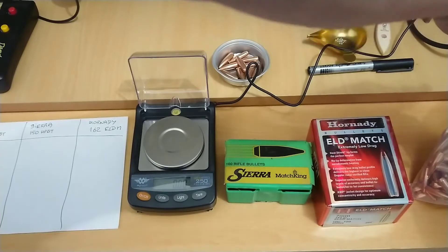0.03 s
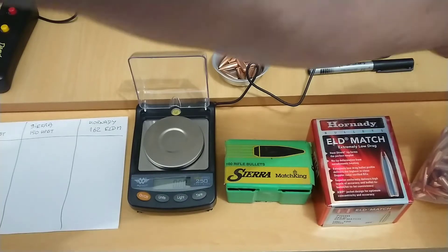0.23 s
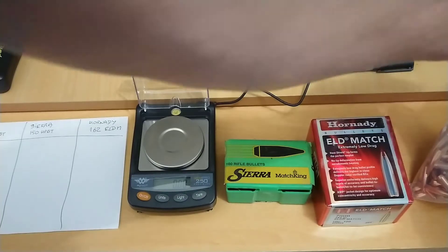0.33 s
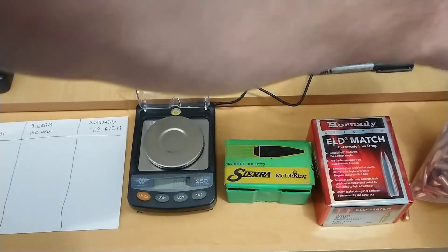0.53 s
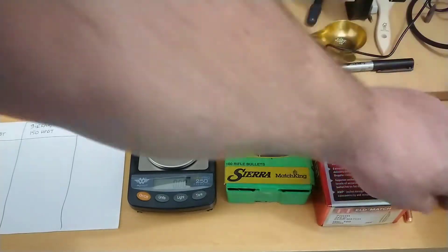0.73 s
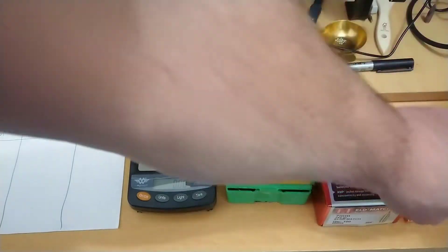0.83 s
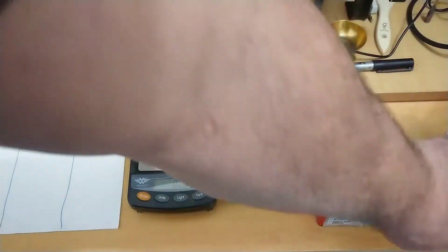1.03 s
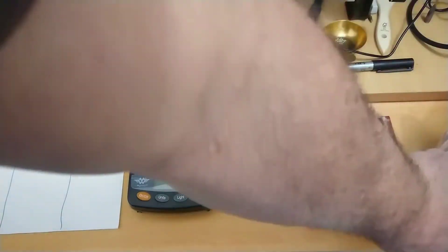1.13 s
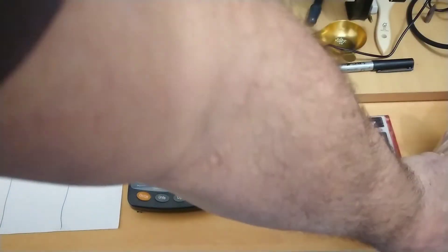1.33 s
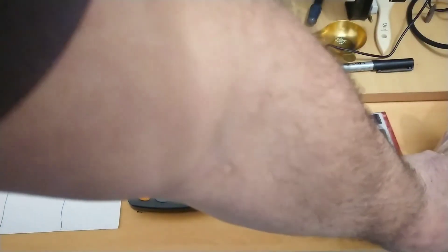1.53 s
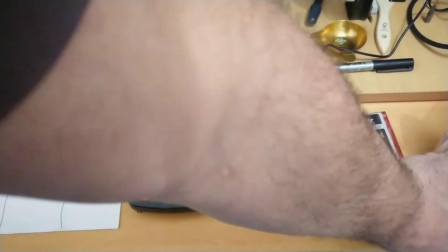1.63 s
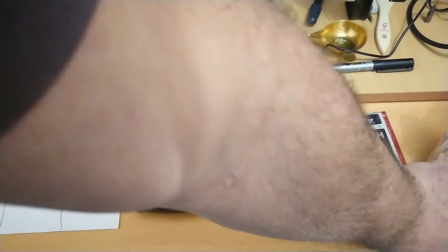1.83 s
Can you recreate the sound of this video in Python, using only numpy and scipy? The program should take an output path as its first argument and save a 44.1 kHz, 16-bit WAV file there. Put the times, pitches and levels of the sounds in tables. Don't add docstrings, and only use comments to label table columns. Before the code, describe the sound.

A bag of loose metal bullets drops on a desk, clattering, bouncing and settling, then faint rustling

```python
import sys
import numpy as np
from scipy import signal
from scipy.fft import rfft, irfft
from scipy.io import wavfile
from scipy.ndimage import uniform_filter1d

SR = 44100
rng = np.random.default_rng(int(sys.argv[2]) if len(sys.argv) > 2 else 0)


def pcm_store(signal):
    levels = np.round(np.clip(np.atleast_2d(signal), -1, 1) * 32767)
    wavfile.write(sys.argv[1], SR, levels.astype(np.int16).T)


def convert_level_to_amplitude(level_db):
    exponent = np.asarray(level_db, float) / 20
    return 10 ** exponent


N = 83790
RISE_S = .0006

# t/s, clatter/dB, desk thud re clatter/dB, bright tick re clatter/dB, hardness/dB
BOUNCES = [(0.19, -47, -8, -3, -2.5), (0.228, -30.5, -9, -7.5, -4.5), (0.2386, -33, 12, -12, -11),
           (0.2459, -25, -15.5, -6.5, 0), (0.249, -20, -17, -15, 1), (.2535, -23.5, -19.5, -8, -8),
           (.260, -19.5, -14, -30, -1.5), (0.268, -30, -18, -19.5, 2.5), (0.278, -26, -15, -14.5, 9.5),
           (0.3721, -26.5, -7.5, -13, -26), (0.391, -28.5, -2.5, -19.5, -28), (0.401, -34.5, -1, -15, -29),
           (0.4279, -38, -11, -24, -29.5), (0.4514, -38.5, -19.5, -29, -10), (0.474, -31, -13.5, -26, 3.5),
           (0.4771, -27.5, -35, -8.5, 1.5), (0.509, -41.5, -8.5, -35, 11.5), (0.543, -24, -8.5, -12, -30),
           (.6084, -26.5, -10, -17.5, -20), (.641, -37, -33, -14, 0), (0.656, -31.5, -13, -18.5, -3),
           (0.681, -31, -9, -18.5, -30), (0.708, -38, -0.5, -30, -27), (0.746, -40, -6, -49, -36)]
# t/s, level/dB, hardness/dB
STRIKES = [(.2458, 1, -6), (.2501, 12, -7), (.2535, 0, -5), (.3729, 3, -18), (.4011, -3.5, -18),
           (.4267, -6, -18), (.4741, -6.5, -3), (.4765, -5, -6), (.4777, 7.5, -4), (.5429, 7, -14),
           (.6086, 2.5, -15), (.6551, -5, -7), (.6811, -1.5, -18), (.7069, -7, -18)]
# f/Hz, density/dB
CLATTER = [(290, -41.5), (500, -8.5), (1000, -1.5), (1390, -4.5), (1700, 0), (2200, 3), (3820, -23),
           (5000, -29), (6500, -50.5), (11000, -120)]
# f/Hz, density/dB
HARD = [(3000, -0.5), (3600, 2.8), (5000, -6.5), (6000, -12.5), (7000, -15)]


def bullets():
    # f/Hz, density/dB
    bright = [(5500, -7), (7200, 4), (8500, -2), (11000, -6), (13200, -2), (15000, -5), (15500, -9),
              (16000, -22)]
    # f/Hz, level/dB, T60/s
    desk = [(371.8, 4, 0.044), (438.6, 7, 0.081), (270.7, -5.5, 0.11), (528.5, -5, 0.082)]
    times, clatter, thud, tick, hardness = np.transpose(BOUNCES)
    shake = agitation(clatter, .007, -11, .015, stir_db=7.5)
    hard = agitation(clatter + hardness, .007, -6.5, .01, stir_db=-15.5)
    snap = agitation(clatter + tick, .0014, -17, .014, stir_db=-22)
    push = sum(convert_level_to_amplitude(db + 8.5) * blow(s, .00088) for s, db in zip(times, clatter + thud))

    body = panel() - clink() + firm_strikes(shake)
    body += convert_level_to_amplitude(-6.5) * through(shake * collisions(), colour(sloped(CLATTER)))
    body += convert_level_to_amplitude(-5.5) * through(hard * collisions(), colour(sloped(HARD)))
    crackle = convert_level_to_amplitude(4.5) * through(snap * collisions(), colour(sloped(bright)))
    return without_lows(body + crackle + through(push, ring(desk)))


def firm_strikes(shake):
    # f/Hz, density/dB
    strike = [(290, -35), (480, -16), (660, -19), (920, -6), (1400, -3), (2300, -1), (3100, -1),
              (4200, -11), (5500, -26), (11000, -60)]
    # delay/ms, signed gain/1
    paths = [(.14, -.14), (1.29, .17), (2.24, -.08), (2.59, .36), (2.88, -.09), (3.74, -.08), (3.97, .28),
             (4.6, -.34), (5.76, .18), (6.58, -.14), (7.12, .12), (7.55, .09), (7.85, -.16), (8.21, .14),
             (8.62, -.12), (9.32, .11), (9.68, .15), (11.88, .26), (12.72, .1), (13.27, .14), (13.95, .12),
             (14.31, -.1), (15.46, .22), (16.3, .14), (17.1, -.08), (17.48, -.1), (18.91, -.11),
             (19.52, .16), (21.66, .09), (22.63, -.1), (24.4, .08), (26.6, -.07), (27.3, .07), (29.8, .1),
             (33.6, .09), (34.6, -.07), (38.2, .07), (42, -.05)]
    blows = spikes([(s, convert_level_to_amplitude(db)) for s, db, _ in STRIKES])
    hard_blows = spikes([(s, convert_level_to_amplitude(db + hard_db)) for s, db, hard_db in STRIKES])
    firm = through(blows + convert_level_to_amplitude(-9) * shake * collisions(), colour(sloped(strike)))
    firm += through(hard_blows, colour(sloped(HARD)))
    reflections = spikes([(ms / 1000, gain) for ms, gain in paths])[:SR // 20]
    return through(firm, reflections)


def panel():
    # f/Hz, level/dB, T60/s
    panel_modes = [(928, 0, .05), (1215, -3, .05)]
    blows = spikes([(s + .002, convert_level_to_amplitude(db)) for s, db, _ in STRIKES])
    return convert_level_to_amplitude(-38) * through(blows, ring(panel_modes))


def clink():
    metal = colour(sloped(CLATTER)) + .5 * colour(sloped(HARD))
    return through(spikes([(.2391, convert_level_to_amplitude(-9))]), metal)


def agitation(levels, fast_s, slow_db, slow_s, stir_db):
    # t/s, level/dB
    stir = [(.3, -70), (.36, -63), (.42, -49.5), (.52, -59.5), (.64, -40.5), (.71, -52.5), (.77, -62.5),
            (.84, -62), (.9, -92)]
    bursts = sum(convert_level_to_amplitude(db) * after(row[0], fast_s, slow_db, slow_s) for row, db in zip(BOUNCES, levels))
    started = np.arange(N) > stir[0][0] * SR
    return bursts + convert_level_to_amplitude(stir_db) * convert_level_to_amplitude(curve(stir)) * started


def collisions():
    clicks_per_s, spread_db, first_db = 6000, 2.2, 13
    size = convert_level_to_amplitude(spread_db * np.minimum(rng.exponential(1, N), 4)) * rng.choice([-1., 1.], N)
    train = evened(size * (rng.random(N) < clicks_per_s / SR))
    train[[round((row[0] + 2 * RISE_S) * SR) for row in BOUNCES]] = convert_level_to_amplitude(first_db)
    return train


def without_lows(x):
    return signal.sosfilt(signal.butter(10, 255, "high", fs=SR, output="sos"), x)


def nudges():
    # t/s, level/dB, upper modes re level/dB, contact/s
    soft = [(0.148, -49, -33, 0.0056), (1.153, -57.5, -21.5, 0.0075), (1.173, -52.5, -14, 0.011),
            (1.627, -35.5, -7.5, 0.0054), (1.646, -60.5, 8, 0.007), (1.6862, -38, -4.5, 0.012),
            (1.71, -49.5, -28, 0.0156), (1.804, -67, 1.5, 0.015)]
    # f/Hz, level/dB
    hollow = [(374, 0), (470, -16), (265, -16)]
    # f/Hz, level/dB
    box = [(748, -6), (1091, 0), (1211, -7), (1465, -2), (900, -14)]
    # t/s, level/dB, f/Hz, contact/s
    taps_on_box = [(.775, -58, 740, .012), (.79, -58, 1090, .012), (.8, -59, 900, .01),
                   (.818, -57, 1394, .02), (.826, -60, 1120, .01), (.834, -59, 850, .014),
                   (1.153, -57, 1475, .01), (1.175, -56, 888, .012)]
    # f/Hz, level/dB
    first_touch = [(220, -1.5), (380, 0), (750, 4), (1100, -1)]
    # t/s, level/dB
    bumps = [
        (0.248, -48.5),
        (1.013, -52.5),
        (1.167, -62.5),
    ]
    out = sum(convert_level_to_amplitude(db + 1.5) * (knock(s, contact, hollow) + convert_level_to_amplitude(up_db) * knock(s, contact, box))
              for s, db, up_db, contact in soft)
    out += sum(convert_level_to_amplitude(db) * knock(s, contact, [(hz, 0)]) for s, db, hz, contact in taps_on_box)
    out += convert_level_to_amplitude(-39) * knock(.191, .0091, first_touch)
    out += sum(convert_level_to_amplitude(db) * knock(s, .016, [(98, 3.0), (140, -12.5)]) for s, db in bumps)
    return out + film_puffs() + film_ticks()


def film_puffs():
    # t/s, level/dB
    puffs = [(.998, -68.5), (1.154, -69), (1.627, -76), (1.645, -64), (1.687, -52.5), (1.822, -65.5)]
    bursts = sum(convert_level_to_amplitude(db) * after(s, .0052) for s, db in puffs) * collisions()
    return through(bursts, colour(lambda f: -8 * abs(np.log2((f + 1) / 3500))))


def film_ticks():
    # t/s, level/dB, f/Hz
    ticks = [
        (1.0992, -40.5, 10100),
        (1.349, -34.5, 7350),
    ]
    out = np.zeros(N)
    for s, db, hz in ticks:
        film = colour(lambda f: -22 * abs(np.log2((f + 1) / hz)) - 25 * np.maximum(np.log2(hz / (f + 1)), 0))
        out += convert_level_to_amplitude(db - 10) * through(after(s - .001, .0007, -10, .0074) * white(), film)
    return out


def drag():
    # t/s, level/dB
    pressure = [(0, -65), (.12, -69), (.3, -98), (.96, -97), (1.008, -74.5), (1.058, -87), (1.124, -71),
                (1.296, -59.5), (1.64, -55), (1.78, -70), (1.83, -67.5), (1.9, -86)]
    # f/Hz, density/dB
    scrape = [(120, -51), (200, -12.5), (440, 5.5), (933, -7.5), (1270, -4), (3690, -8), (5520, -18),
              (13600, -22.5), (16000, -22.5)]
    # f/Hz, width/Hz, height/dB
    peaks = [
        (450, 200, 2),
        (3700, 700, 4),
        (7300, 1300, 7),
        (9900, 200, 7),
    ]

    def shape(hz):
        resonances = sum(db / (1 + (2 * (hz - f) / width) ** 2) for f, width, db in peaks)
        return sloped(scrape)(hz) + resonances

    return convert_level_to_amplitude(3 + curve(pressure)) * through(wavering(1, 300) * white(), colour(shape))


def knock(s, contact, modes):
    rise_s, let_go_s = .002, .0034
    u = np.maximum(np.arange(N) / SR - s, 0)
    shape = (1 - np.exp(-u / rise_s)) * np.exp(-np.maximum(u - contact, 0) / let_go_s)
    return shape * sum(convert_level_to_amplitude(db) * np.sin(2 * np.pi * hz * u) for hz, db in modes)


def room(x, build):
    # f/Hz, T60/s
    decay = [(100, 0.13), (400, 0.24), (1000, 0.3), (2500, 0.23), (5000, 0.24), (9000, 0.36), (12000, 0.23),
             (15000, 0.26)]
    taps = np.zeros(SR // 2)
    at = np.arange(100, SR // 2 - 20, 20)
    taps[at + rng.integers(0, 20, len(at))] = rng.choice([-1., 1.], len(at))
    hz, t, z = signal.stft(taps, SR, nperseg=256)
    t60 = np.clip(read(decay, hz), .05, 1)[:, None]
    tail = signal.istft(z * convert_level_to_amplitude(-60 * t / t60), SR, nperseg=256)[1]
    tail = tail * np.minimum(np.arange(len(tail)) / SR / build, 1) ** 2
    return through(x, tail / np.linalg.norm(tail))


def floor():
    # f/Hz, density/dB
    tone = [(150, -7.5), (350, -1.5), (720, -1.5), (1340, -9.5), (3500, -27.5), (5500, -33.5), (8000, -35),
            (16000, -33)]
    # t/s, level/dB
    settle = [(0, -2.5), (.2, 10.5), (1.0, 2), (1.9, 4.5)]
    # f/Hz, density/dB
    low = [(15, -53), (25, -9.5), (70, -3), (91, -3), (150, -17), (200, -50), (330, -120)]
    hum_hz, hum_width_hz = 101.8, 11
    resonance = colour(lambda hz: -20 * np.log10(1 + (2 * (hz - hum_hz) / hum_width_hz) ** 2))
    hum = wavering(2.5, 1500) * evened(through(white(), resonance))
    air = through(white(), colour(sloped(tone)))
    rumble = through(white(), colour(sloped(low)))
    return convert_level_to_amplitude(-64.5 + curve(settle)) * air + convert_level_to_amplitude(-70.5) * rumble + convert_level_to_amplitude(-66.5) * hum


def white():
    return rng.standard_normal(N)


def wavering(db, size):
    return convert_level_to_amplitude(db * evened(uniform_filter1d(white(), size=size)))


def evened(x):
    return x / np.sqrt(np.mean(x ** 2) + 1e-20)


def read(points, hz):
    f, value = np.transpose(points)
    return np.interp(np.log(hz + 1), np.log(f + 1), value)


def curve(points):
    return np.interp(np.arange(N) / SR, *np.transpose(points))


def colour(db_of_hz):
    hz = abs(np.fft.fftfreq(8192, 1 / SR))
    log = np.log(convert_level_to_amplitude(np.maximum(db_of_hz(hz), -100)))
    taps = np.fft.ifft(np.exp(log - 1j * signal.hilbert(log).imag)).real[:2048]
    return taps / np.linalg.norm(taps)


def sloped(points):
    lo, hi = points[0][0], points[-1][0]

    def gain_db(hz):
        below = np.maximum(np.log2(lo / (hz + 1)), 0)
        above = np.maximum(np.log2((hz + 1) / hi), 0)
        return read(points, hz) - 24 * below - 12 * above

    return gain_db


def ring(modes):
    t = np.arange(6000) / SR
    x = sum(convert_level_to_amplitude(db - 60 * t / np.clip(t60, .01, .09)) * np.sin(2 * np.pi * hz * t) for hz, db, t60 in modes)
    return x / abs(x).max()


def through(x, taps):
    return signal.oaconvolve(x, taps)[:N]


def after(s, fast, slow_db=-99, slow=1):
    u = np.maximum(np.arange(N) / SR - s, 0)
    return (1 - np.exp(-u / RISE_S)) * (np.exp(-u / fast) + convert_level_to_amplitude(slow_db) * np.exp(-u / slow))


def blow(s, width):
    t = np.arange(N) / SR - s
    return (t > 0) * (t < width) * np.sin(np.pi * t / width) / (width * SR) * np.pi / 2


def spikes(points):
    x = np.zeros(N)
    for s, size in points:
        x[round(s * SR)] += size
    return x


def scene():
    # f/Hz, coherence/1
    likeness = [(60, .7), (130, .65), (330, .92), (640, .4), (1400, .2), (3100, .05), (15000, 0)]
    # f/Hz, left re right/dB
    cover = [(60, -20.5), (110, -19.5), (200, -24), (380, -14), (700, -17.5), (1290, -19.5), (2380, -20.5),
             (4400, -18), (8120, -25.5), (15000, -33)]
    hits = bullets() + nudges()
    right = hits + convert_level_to_amplitude(-8.5) * room(hits, .015) + drag() + floor()
    other = convert_level_to_amplitude(1) * room(hits, .002) + drag() + floor()
    hz = np.fft.rfftfreq(N, 1 / SR)
    same = np.clip(read(likeness, hz), 0, 1)
    mixed = same * rfft(right) + np.sqrt(1 - same ** 2) * rfft(other)
    left = irfft(convert_level_to_amplitude(read(cover, hz)) * mixed, N)
    return convert_level_to_amplitude(6) * np.array([left, right])


def band_limit(x):
    return signal.sosfilt(signal.butter(12, 16500, fs=SR, output="sos"), x)


def record(dry):
    x = signal.oaconvolve(dry, signal.firwin(255, 15700, fs=SR)[None], "same")
    x = x / (1 + (abs(x) / .93) ** 6) ** (1 / 6)
    return band_limit(x)


dry = scene()
out = record(dry)
pcm_store(out)
```